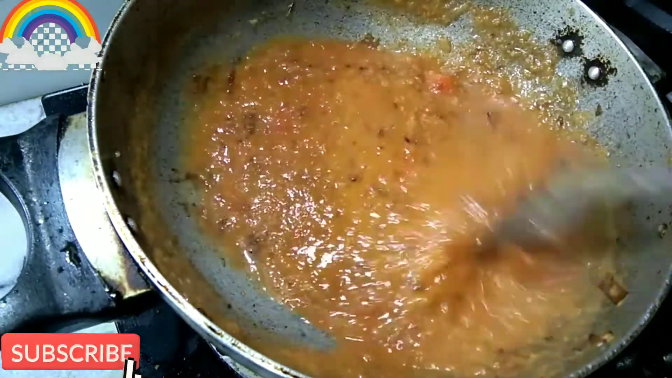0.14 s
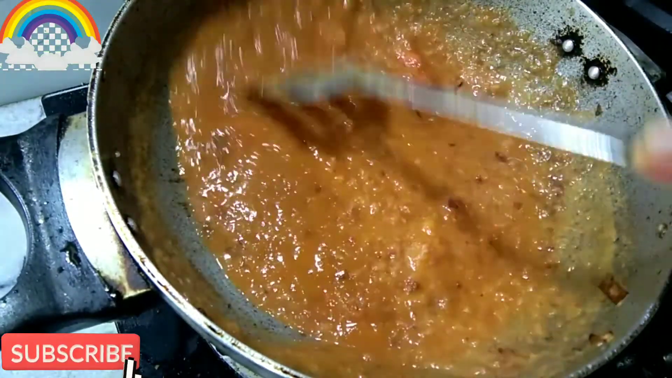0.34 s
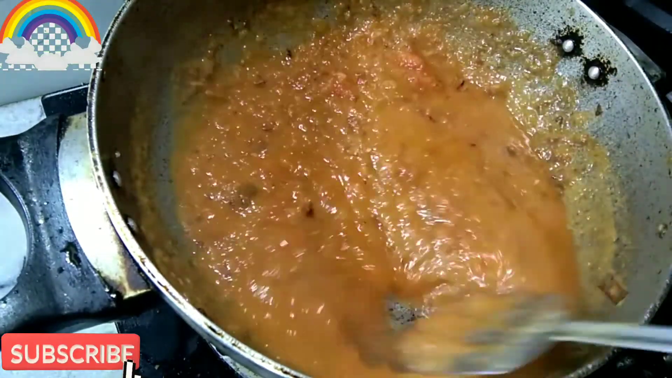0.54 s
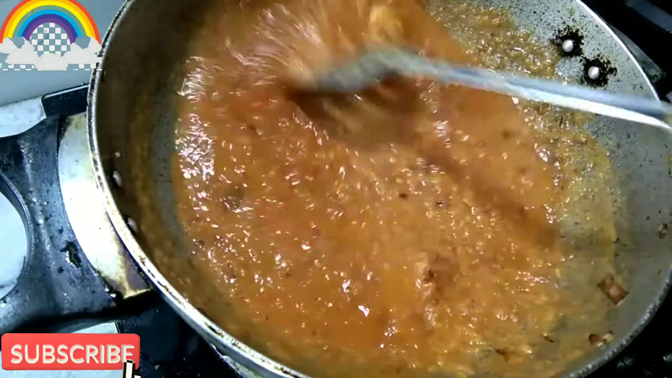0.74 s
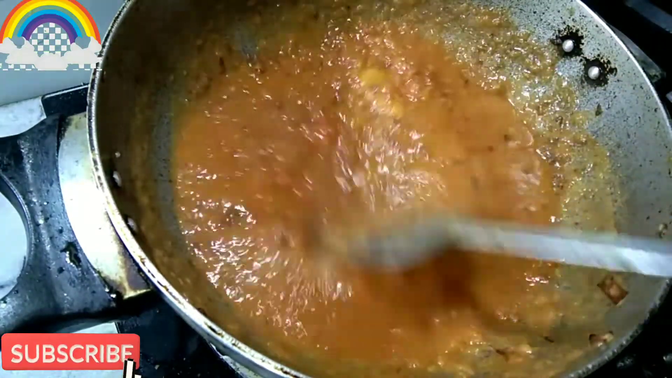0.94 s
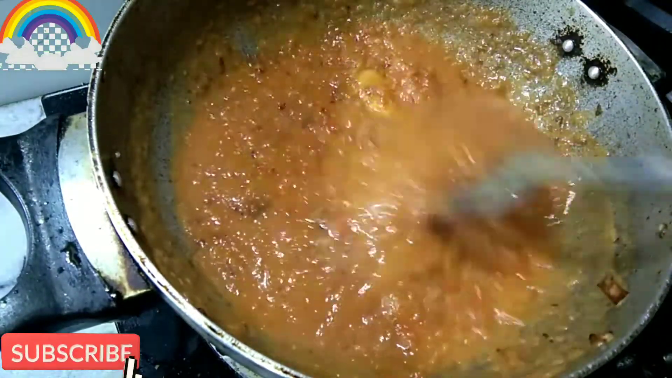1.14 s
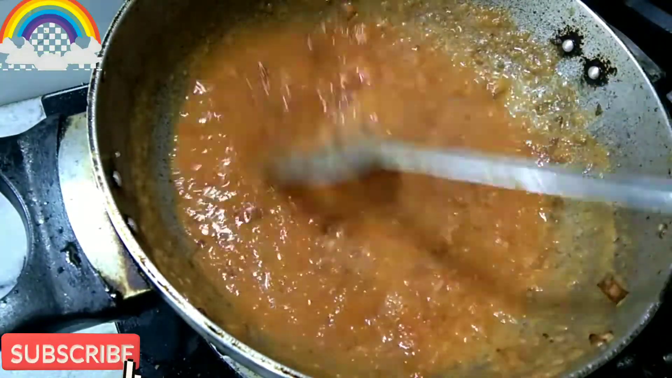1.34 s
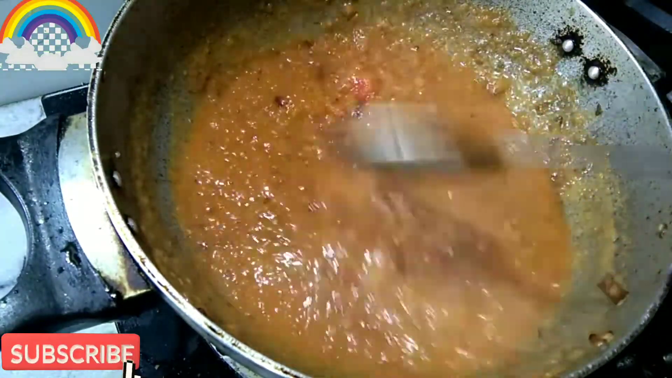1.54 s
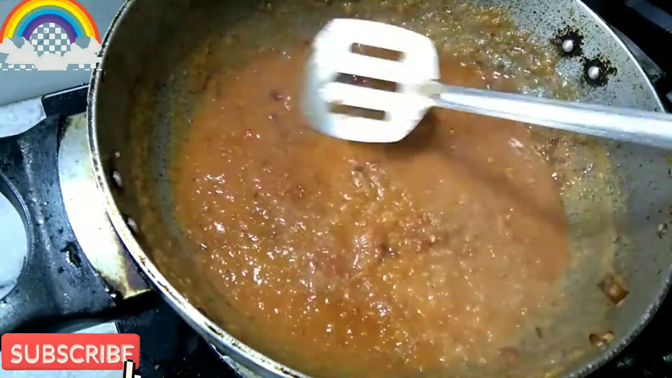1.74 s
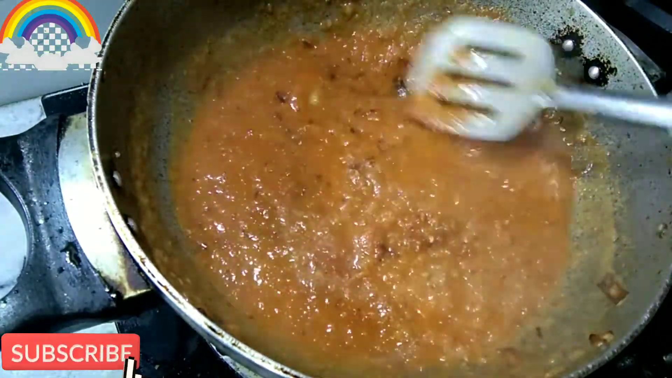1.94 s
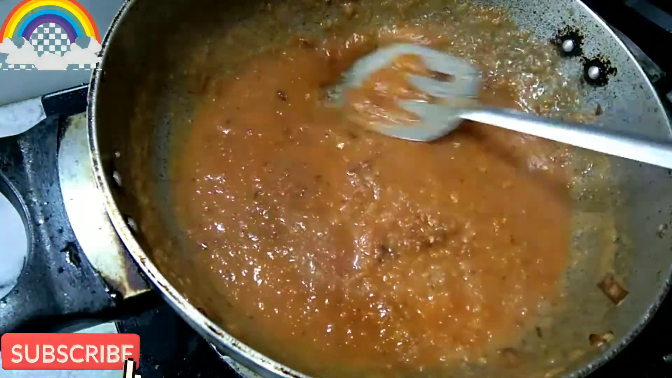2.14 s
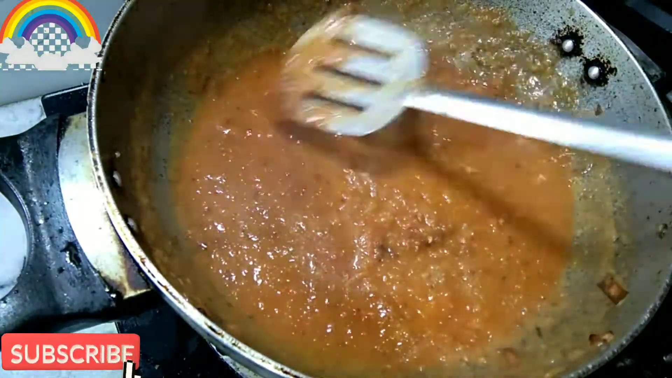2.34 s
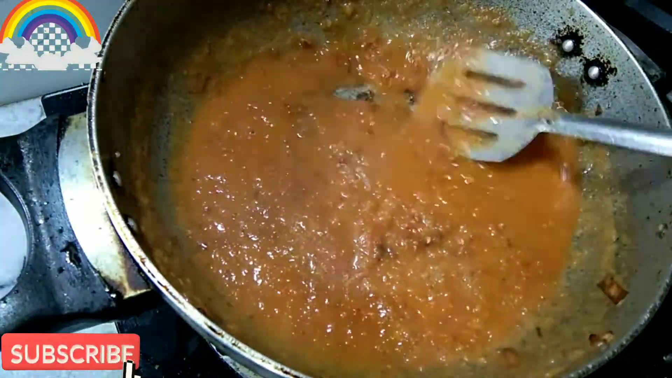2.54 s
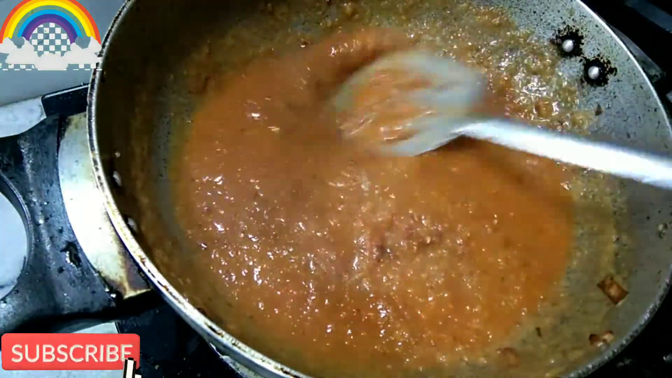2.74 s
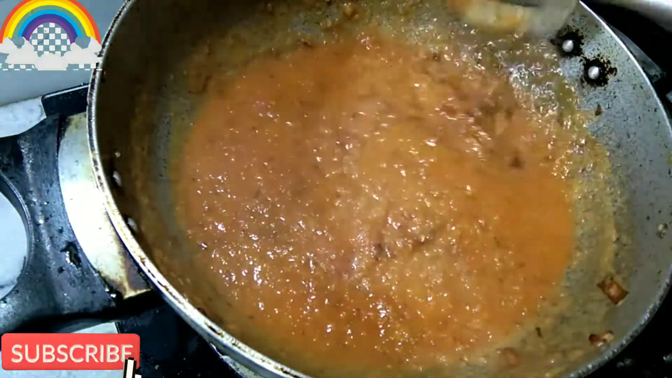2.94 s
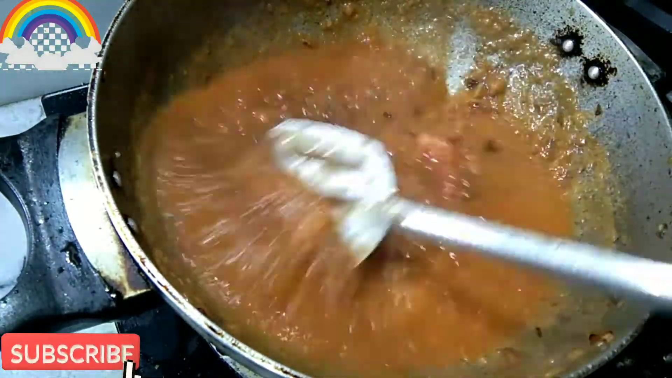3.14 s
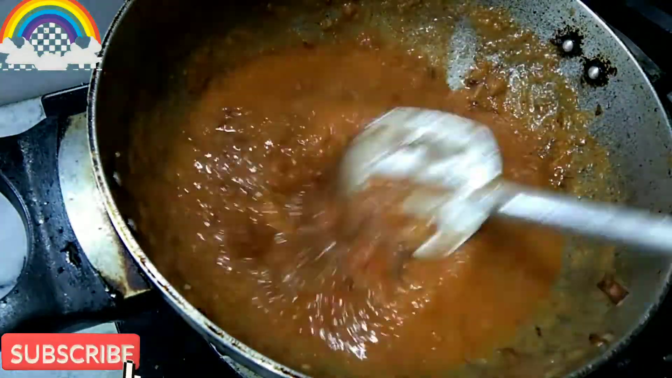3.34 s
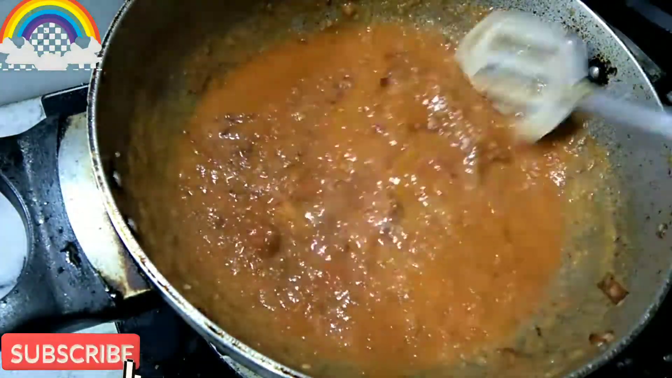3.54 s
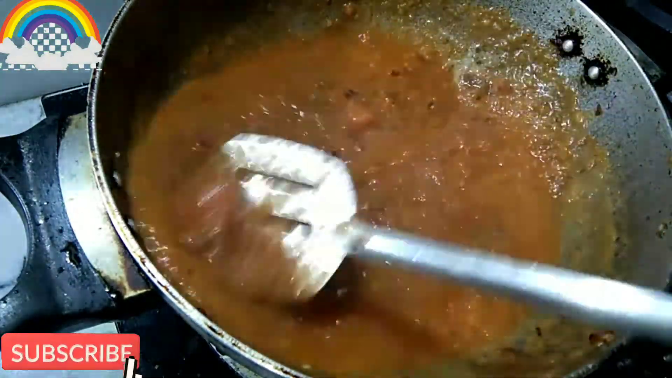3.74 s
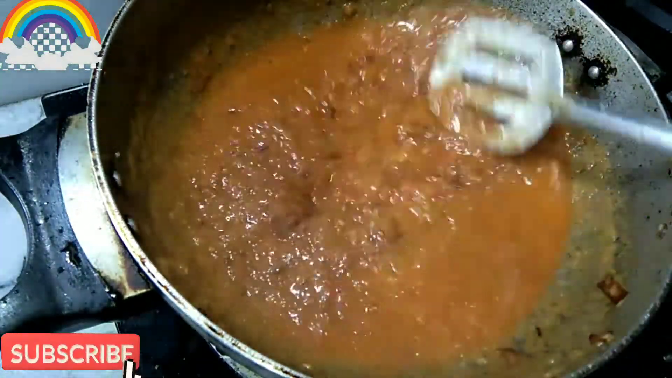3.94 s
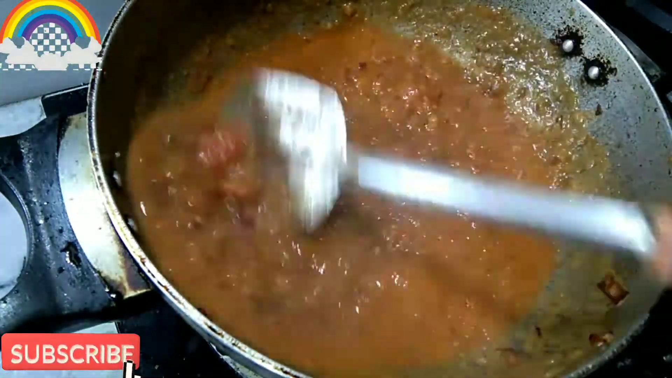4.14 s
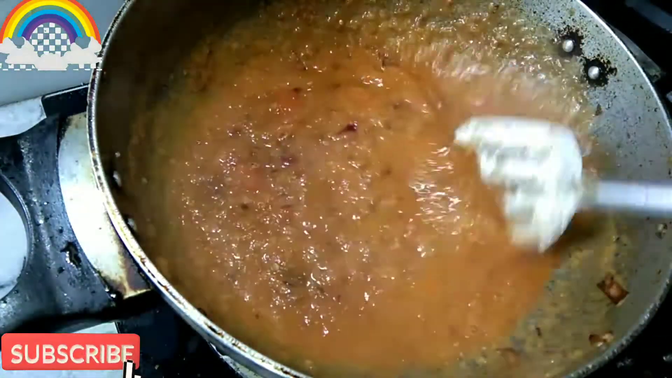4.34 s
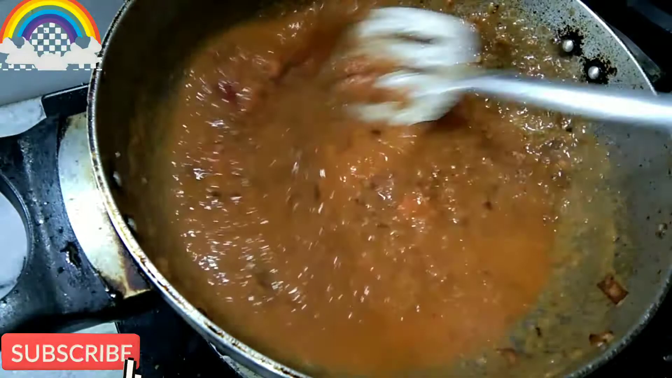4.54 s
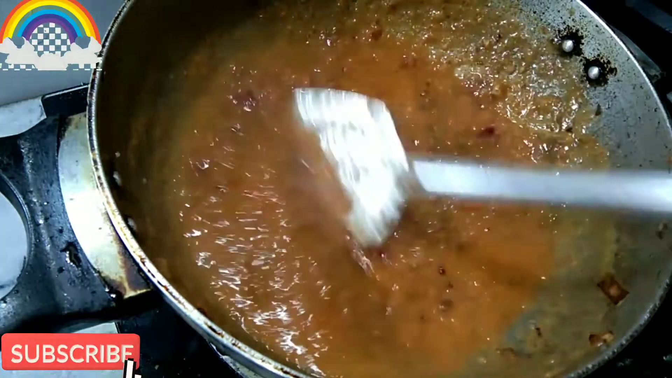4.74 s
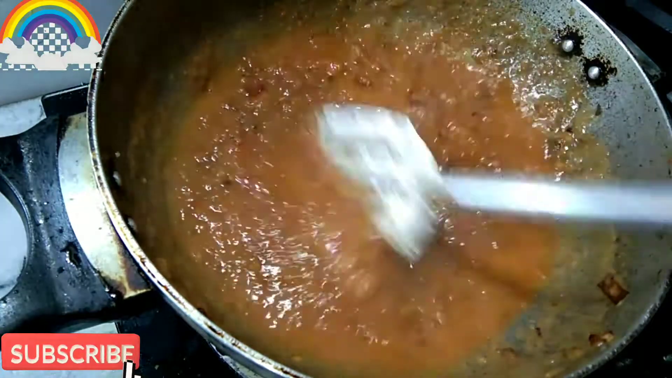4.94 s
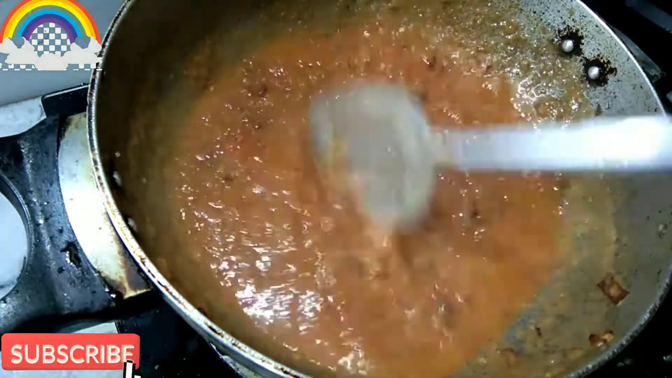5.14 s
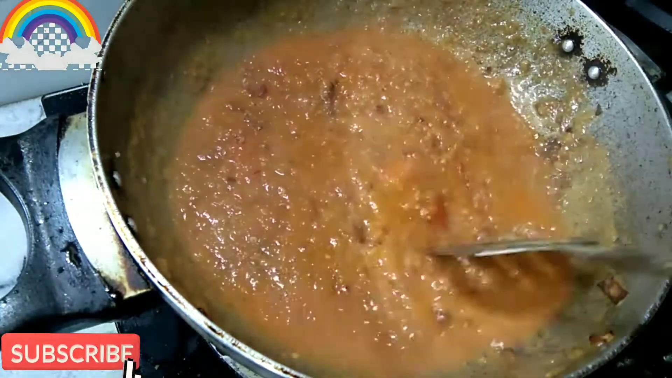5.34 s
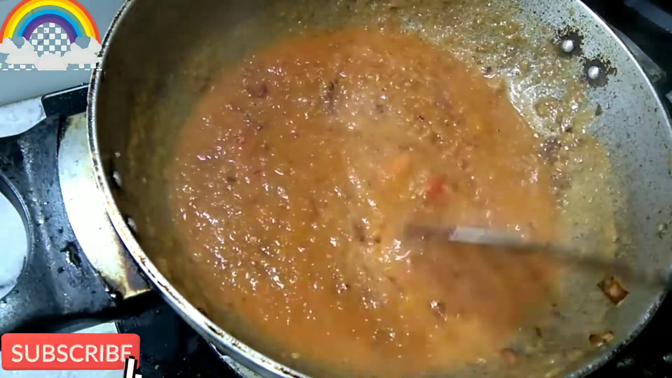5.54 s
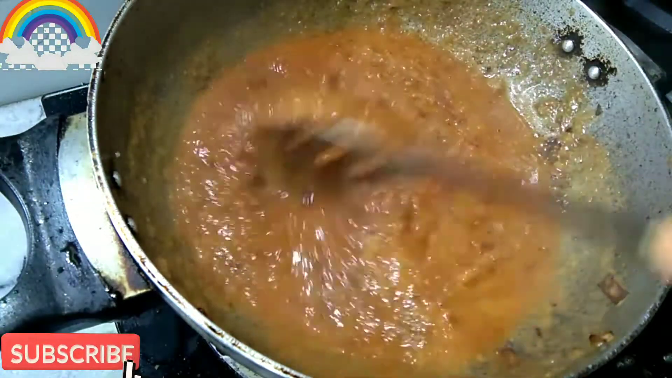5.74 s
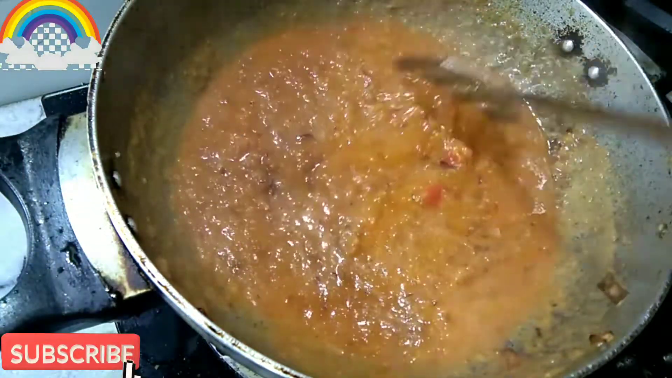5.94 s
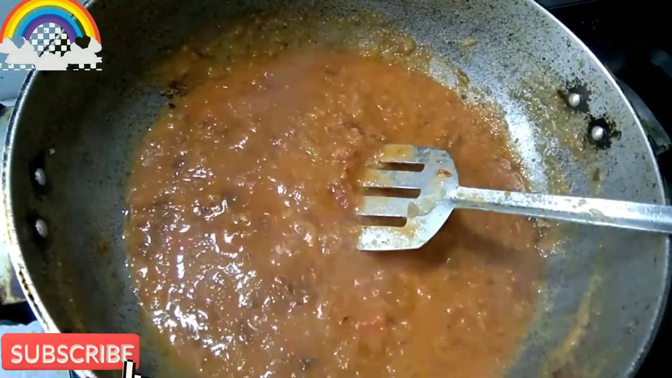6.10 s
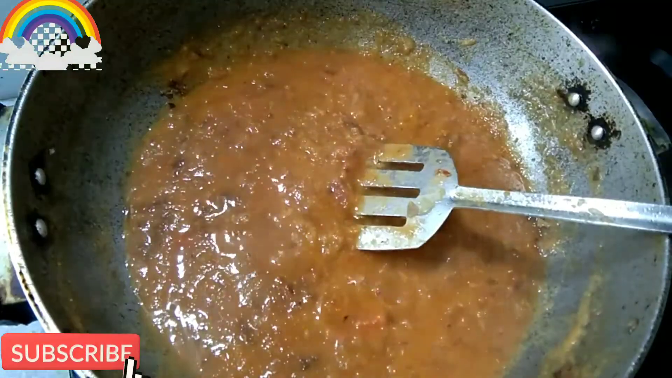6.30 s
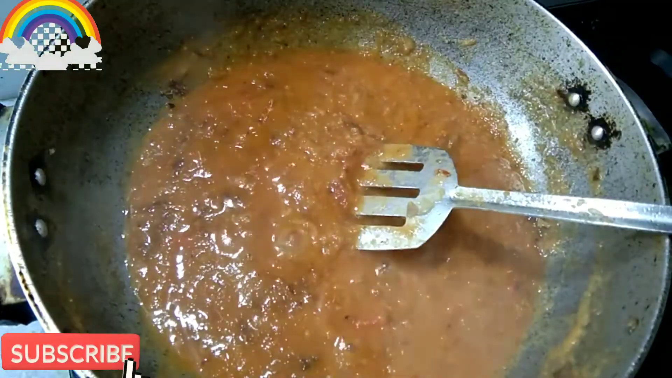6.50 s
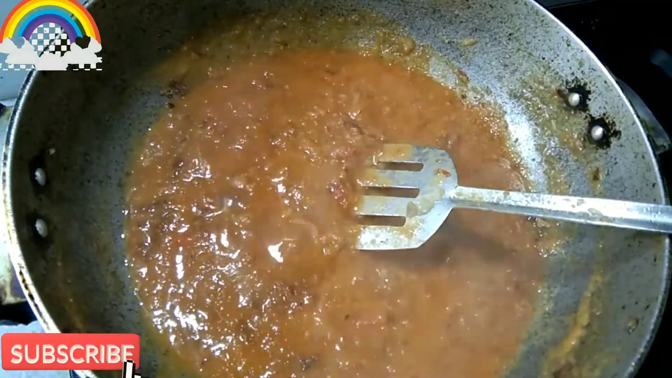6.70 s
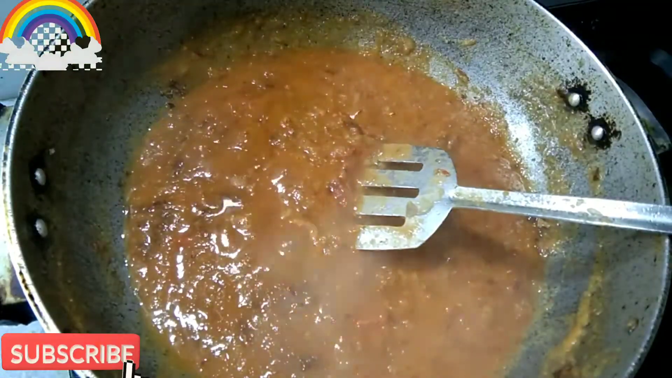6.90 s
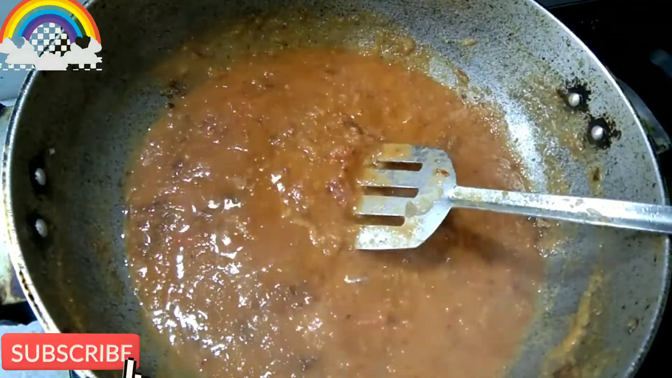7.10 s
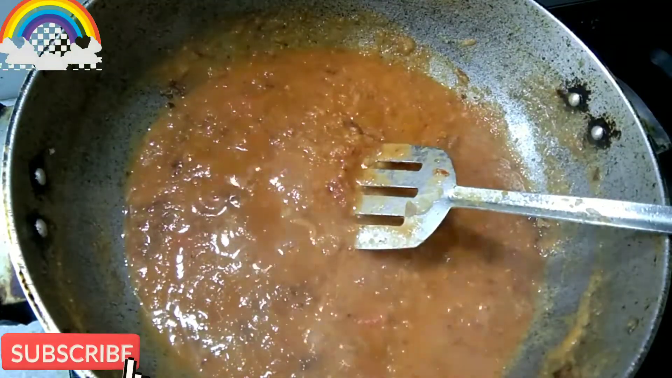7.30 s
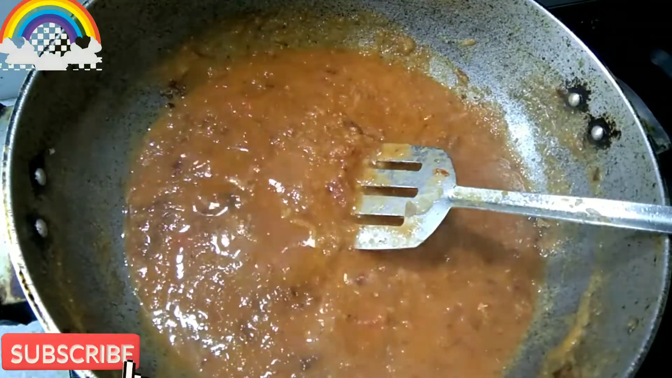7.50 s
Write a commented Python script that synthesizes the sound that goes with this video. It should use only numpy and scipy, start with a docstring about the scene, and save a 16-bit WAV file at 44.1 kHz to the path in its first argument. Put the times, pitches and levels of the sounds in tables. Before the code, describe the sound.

In a small kitchen, a slotted metal spatula rapidly scrapes a pan of thick paste, gritty and dull. A quieter gap follows with faint high whistles from outside, then sharper knocks and scattered scrapes, some loud. The scene cuts abruptly to simmering: fizz, small bubbles popping and bright fat spits, with one light touch of metal. A low burner rumble lies beneath. Close microphone, short room echo.

```python
"""A slotted steel spatula scrapes and knocks on a round metal pan of simmering paste in a small kitchen.
Scrapes are gritty noise and knocks are short noise bursts; both drive the pan's modes, a short dull ring
damped by the paste. The burner rumbles as filtered noise and thin whistles, narrow noise, come from outside.
Near the end the scene jumps to a later moment: the spatula rests and the paste bubbles and spits,
made of fizz, hiss and short damped tones."""
import sys
import numpy as np
from scipy import signal
from scipy.io import wavfile
from scipy.ndimage import uniform_filter1d

SR = 44100
rng = np.random.default_rng(int(sys.argv[2]) if len(sys.argv) > 2 else 0)


def int16_out(signal):
    """Quantize to a 16-bit WAV file."""
    q = np.round(np.clip(np.atleast_2d(signal).T, -1, 1) * 32767)
    wavfile.write(sys.argv[1], SR, q.astype(np.int16))


N = 333512  # length in samples
SPLIT_HZ = 3000  # below is the body of a sound, above is its edge
JUMP_S = 6.043  # when the scene jumps to the later moment


def gain_of(db):
    """Turns dB into a plain gain."""
    return 10 ** (np.asarray(db) / 20)


def evened(x):
    """Scales a sound to rms 1."""
    return x / np.sqrt(np.mean(x ** 2) + 1e-20)


def read(points, hz):
    """Reads a table of (Hz, value) along a log frequency axis."""
    f, value = np.transpose(points)
    return np.interp(np.log(hz + 1), np.log(f + 1), value)


def add(mix, s, sound):
    """Mixes a sound in at time s, cut at the end of the mix."""
    part = mix[..., round(s * SR):][..., :sound.shape[-1]]
    part += sound[..., :part.shape[-1]]


def colour(x, points):
    """Filters with the given spectrum, minimum phase (nothing sounds early), total energy 1."""
    spectrum_db = read(points, abs(np.fft.fftfreq(4096, 1 / SR)))
    log_gain = np.log(gain_of(np.maximum(spectrum_db, -100)))
    # the Hilbert transform of the log gain gives the minimum phase
    taps = np.fft.ifft(np.exp(np.conj(signal.hilbert(log_gain)))).real[:2048]
    return signal.oaconvolve(x, taps / np.linalg.norm(taps))[:len(x)]


def ring(x, hz, width):
    """One mode with a peak gain of 1; a wider mode (Hz) dies sooner."""
    pole = np.exp((2j * np.pi * hz - np.pi * width) / SR)
    return 2 * signal.lfilter([1 - abs(pole)], [1, -pole], x + 1e-18).real


def drift(per_s):
    """Slow chance: noise averaged twice over 1 / per_s seconds, rms 1."""
    size = max(round(SR / per_s), 1)
    smooth = uniform_filter1d(uniform_filter1d(rng.standard_normal(N), size), size)
    return evened(smooth)


def band(x, side):
    """Body (0) or edge (1) of a sound."""
    return signal.sosfilt(signal.butter(4, SPLIT_HZ, ["low", "high"][side], fs=SR, output="sos"), x)


def grit(per_s, spread_db):
    """Random clicks, a few of them large, rms 1."""
    size = gain_of(spread_db * np.minimum(rng.exponential(1, N), 5))
    signed = size * rng.choice([-1., 1.], N)
    return evened(signed * (rng.random(N) < per_s / SR))


def pressure():
    """Bite, hold and lift of every stroke, for body and edge, and the pitch that the contact favours."""
    # Each row is one drag of the blade: start in seconds, length in seconds, level in dB, swell in dB by
    # its end, pitch in Hz that the contact favours, brightness in dB of the edge above the body.
    stroke_rows = [(0.0, 0.08, -50.5, -6, 1720, -3.5), (0.097, 0.025, -62.5, 5.5, 720, -8),
                   (0.147, 0.051, -40, -1, 720, -7), (0.192, 0.032, -47, -1.5, 1237, -4.5),
                   (0.238, 0.044, -39.5, -1.5, 674, -8.5), (0.344, 0.029, -43.5, -6.5, 710, -12),
                   (0.379, 0.0072, -44.5, -1.5, 2160, -6), (0.42, 0.017, -41, -7, 2190, -2),
                   (0.458, 0.033, -49.5, 2, 1280, -4), (0.499, 0.019, -49, -4, 2030, -5.5),
                   (0.541, 0.15, -68.5, -2, 695, -12), (0.631, 0.015, -47, -3.5, 1290, -6.5),
                   (0.661, 0.03, -46, -0.5, 860, -9), (0.7, 0.0099, -43.5, 2, 1260, -6),
                   (0.774, 0.0093, -47.5, -1.5, 704, -9), (0.824, 0.042, -42.5, -1.5, 710, -11),
                   (0.86, 0.058, -48, 3, 1240, -1.5), (0.906, 0.075, -46, -2, 1540, -5.5),
                   (1.007, 0.014, -49.5, -2, 1595, -3.5), (1.113, 0.064, -48, -8.5, 643, -15.5),
                   (1.183, 0.029, -61, -1.5, 1200, 2), (1.233, 0.032, -45, 1, 650, -11),
                   (1.29, 0.036, -56.5, -7, 700, -6), (1.335, 0.0095, -45, -3.5, 1230, -6.5),
                   (1.367, 0.018, -58.5, 2, 1300, -1), (1.392, 0.02, -45, -6.5, 2050, -5.5),
                   (1.423, 0.027, -49, -0.5, 1274, -4.5), (2.143, 0.074, -68, -1.5, 1080, 0),
                   (2.737, 0.021, -52, -5.5, 2230, 1), (3.005, 0.043, -46, 5.5, 840, -4),
                   (3.226, 0.011, -45.5, -11, 1080, -12), (3.262, 0.031, -62, 12.5, 680, -7),
                   (3.297, 0.051, -48, 1, 2150, -2), (3.567, 0.012, -44, 0, 850, 4),
                   (3.582, 0.015, -34, -6, 1450, 0.5), (3.774, 0.021, -36.5, -10, 2400, -6),
                   (3.815, 0.03, -58.5, 5.5, 1160, 3), (3.985, 0.025, -35.5, -9.5, 1440, -10.5),
                   (4.063, 0.078, -53, 2.5, 1220, 0.5), (4.124, 0.021, -43.5, -4.5, 1023, -11),
                   (4.193, 0.03, -51.5, 3.5, 1420, -2), (4.276, 0.054, -54.5, 1, 1300, -0.5),
                   (4.378, 0.028, -46.5, -5.5, 700, -19), (4.426, 0.048, -52, 1.5, 795, -5.5),
                   (4.513, 0.013, -50, -0.5, 2346, -3.5), (4.574, 0.034, -59, 5.5, 1340, 0.5),
                   (4.645, 0.028, -39, -3.5, 1080, -5), (4.75, 0.01, -55.5, -3.5, 1150, 5.5),
                   (4.784, 0.031, -54, -1.5, 1180, -2.5), (4.833, 0.021, -55, -5.5, 1180, 5),
                   (4.886, 0.016, -55, 1.5, 1280, -1), (4.934, 0.028, -40, -7.5, 1323, -2.5),
                   (5, 0.022, -58, 1, 905, -1), (5.054, 0.01, -50.5, -2.5, 2250, 1.5),
                   (5.077, 0.013, -47.5, 2.5, 1380, -7.5), (5.125, 0.03, -47, -8, 1230, -3),
                   (5.293, 0.024, -44.5, -3.5, 2220, -11.5), (5.171, 0.056, -58, -7.5, 664, -6),
                   (5.374, 0.075, -65.5, 3, 670, -7), (5.643, 0.043, -34.5, -7, 1920, -4),
                   (5.692, 0.062, -38.5, -9.5, 920, -11), (5.971, 0.03, -37, -9.5, 2080, -12),
                   (6.575, 0.019, -62.5, -0.5, 900, 4.5), (6.613, 0.019, -54, -6, 1050, 9.5),
                   (6.652, 0.039, -66, -4, 890, 7)]
    bite_s, lift_db_per_s = 0.0051, 428.5  # the blade bites quickly and lifts off at a steady rate
    slide_s = 0.009  # the favoured pitch slides, rather than steps, to its next value
    t, power, near_hz = np.arange(SR // 2) / SR, np.zeros((2, N)), np.ones(N)
    for s, length, db, swell_db, hz, bright_db in stroke_rows:
        held = np.minimum(t / max(length, .005), 1)
        level_db = db + swell_db * held - lift_db_per_s * np.maximum(t - length, 0)
        level_db -= 100 * ((s < JUMP_S) & (s + t > JUMP_S))  # the jump cuts the stroke off
        bite = np.minimum(t / bite_s, 1)
        add(power, s, (bite * gain_of(level_db + [[0], [bright_db]])) ** 2)
        near_hz[round(s * SR):] = hz  # of the strokes begun so far, the last one listed sets the pitch
    return np.sqrt(power), uniform_filter1d(near_hz, max(round(slide_s * SR), 1))


def pan_part(x, modes, wash, wash_db, side):
    """Modes plus broad ring of the body or the edge; little of the modes carries above the top one."""
    lines = sum(ring(x * gain_of(db), hz, width) for hz, width, db in modes)
    lines = signal.sosfilt(signal.butter(6, 8200, fs=SR, output="sos"), lines)
    return lines + gain_of(wash_db) * band(colour(x, wash), side)


def pan(drive, near_hz, wash, wash_db, favour_db, reach, tilt_db, wander_db, damping, unit):
    """The pan's modes over a broad ring, body and edge each scaled to rms 1 for the drive called unit."""
    # Each row is one mode of the pan: pitch in Hz, relative level in dB.
    pan_modes = [(235, -0.5), (390, -8.5), (600, -8), (700, 1.5), (850, -4), (1080, -6.5), (1190, -2),
                 (1300, -6.5), (1420, -13), (1540, -10), (1660, -11), (1980, -9.5), (2090, -10.5),
                 (2260, -15), (2410, -28), (2600, -18), (2800, -21), (3490, -19), (4450, -32), (5300, -35),
                 (5900, -38), (6300, -33.5), (6850, -27.5), (7400, -25)]
    lifts = []
    for hz, _ in pan_modes:
        # the point of contact lifts the modes near one pitch
        nearness = np.exp(-.5 * (np.log(hz / near_hz) / reach) ** 2)
        # as it travels, each mode also swells by chance
        chance_db = wander_db * drift(22.)
        lifts.append(favour_db * nearness + chance_db + tilt_db * np.log2(min(hz, SPLIT_HZ) / 1000))
    out = np.zeros(N)
    for side in range(2):
        # the paste damps high modes faster: width in Hz grows with pitch
        modes = [(hz, (25 + .02 * hz) * damping, db + lift)
                 for (hz, db), lift in zip(pan_modes, lifts) if (hz > SPLIT_HZ) == side]
        sound = pan_part(drive[side], modes, wash, wash_db[side], side)
        norm = pan_part(unit, modes, wash, wash_db[side], side)
        out += sound / np.sqrt(np.mean(norm ** 2))
    return out


def scrape():
    """Stick-slip grit under the blade, pressed by each stroke into the pan."""
    # The dense ring between the modes. Each row: frequency in Hz, relative level in dB per Hz.
    rasp_spectrum = [(60, -26), (150, -9), (300, 4), (700, 3), (2200, -3.5), (5000, -9), (7600, -10.5),
                     (8800, -21), (11000, -50.5), (15400, -44.5), (15700, -48)]
    press, near_hz = pressure()
    rub = evened(grit(2600., 2.8) + .75 * rng.standard_normal(N))
    rub = rub * gain_of(1.5 * drift(160.))  # the level flutters
    return pan(press * rub, near_hz, rasp_spectrum, wash_db=[-21, -22], favour_db=11.5, reach=.08,
               tilt_db=1., wander_db=4., damping=1., unit=rub)


def air():
    """Burner rumble and kitchen hush as filtered noise, with far whistles of narrow noise."""
    # Burner and kitchen. Each row: frequency in Hz, relative level in dB per Hz.
    hush_spectrum = [(12, -37), (20, -28.5), (42, -4.5), (170, 2.5), (296, -10), (663, -18.5), (851, -17),
                     (1160, -20.5), (3920, -24), (4260, -24.5), (5320, -20.5), (9280, -35), (15300, -53)]
    # Thin high whistles, perhaps a far bird. Each row: start in seconds, pitch in Hz, level in dB.
    whistle_rows = [(0.578, 9050, -88), (1.721, 7860, -82), (1.885, 9000, -87), (2.27, 8900, -88),
                    (2.29, 5300, -77), (2.49, 9000, -84.5), (2.66, 9100, -85), (2.9, 8360, -85),
                    (5.2, 8850, -81), (5.43, 9300, -86), (5.44, 5120, -85.5)]
    hush = evened(colour(rng.standard_normal(N), hush_spectrum))
    out = gain_of(-67.5) * hush * gain_of(0.45 * drift(3.4))
    for s, hz, db in whistle_rows:
        hiss = rng.standard_normal(4200)
        fuzzy = evened(ring(ring(hiss, hz, 430.0), hz, 400.))
        add(out, s, gain_of(db) * fuzzy * signal.windows.tukey(len(hiss), .5))
    return out


def knocks():
    """Each knock is a few milliseconds of chatter that cracks and rings the pan."""
    # Each row is one knock of the spatula: start in seconds, relative strength in dB of the body,
    # brightness in dB of the edge above it, pitch in Hz that the contact favours.
    knock_rows = [(0.149, -39, -19, 796), (0.231, -31.5, -8, 692), (0.646, -37, -12.5, 820),
                  (1.103, -39, -8, 1320), (1.241, -52, 4, 673), (2.141, -43, -4.5, 2370),
                  (2.523, -57.5, -3, 1320), (3.004, -34.5, 9, 1800), (3.007, -33.5, 12, 675),
                  (3.055, -32.5, -8, 727), (3.16, -61, 5.5, 1090), (3.216, -41, -10, 2090),
                  (3.565, -26.5, 8, 1480), (3.588, -30, -1, 1140), (3.767, -19.5, -3, 2350),
                  (3.831, -32.5, -8, 1163), (3.925, -60.5, 5, 1294), (3.988, -20, -2, 1463),
                  (4.137, -52, 4, 990), (4.199, -43.5, -17, 1200), (4.384, -43.5, -5.5, 814),
                  (4.517, -40, -2.5, 1215), (4.587, -43.5, -3.5, 1180), (4.647, -48.5, 14, 1173),
                  (4.9403, -34, -10, 1300), (5.2965, -19.5, -10.5, 2260), (5.644, -23.5, -2, 1930),
                  (5.706, -30.5, -17, 1346), (5.968, -19.5, 1.5, 1081), (6.623, -43.5, 6, 955)]
    # The broad crack. Each row: frequency in Hz, relative level in dB per Hz.
    crack_spectrum = [(88, -33), (150, -22), (391, -35), (612, -11), (1170, -1.5), (3490, 8), (4160, 3.5),
                      (7180, 15), (8560, 0.5), (15100, -34.5), (16000, -61)]
    t, drive, near_hz = np.arange(600) / SR, np.zeros((2, N)), np.ones(N)
    chatter = rng.standard_normal((len(knock_rows), len(t)))
    chatter = chatter * gain_of(-60 * t / 0.017) * np.minimum(t / 0.000099, 1)
    chatter[:, round(.0004 * SR)] += 4.  # the first clean contact
    for (s, db, bright_db, hz), burst in zip(knock_rows, chatter):
        add(drive, s, gain_of([[db], [db + bright_db]]) * burst / np.linalg.norm(burst))
        near_hz[round(s * SR):] = hz
    rung = pan(drive, near_hz, crack_spectrum, wash_db=[-8, -12], favour_db=11.0, reach=0.047,
               tilt_db=3.5, wander_db=3.5, damping=4.7, unit=rng.standard_normal(N))
    # a quick blow hardly moves the lowest modes
    return gain_of(17.) * signal.lfilter(*signal.butter(2, 500, "high", fs=SR), rung)


def thuds():
    """The pan rocks on its stand and booms: a short shudder in one low mode."""
    # Each row: start in seconds, peak in dB, pitch in Hz.
    thud_rows = [(0.67, -43, 257), (1.109, -43, 232), (1.239, -50, 259), (4.649, -39, 381),
                 (5.697, -57, 430), (6.543, -51, 141)]
    out, t = np.zeros(N), np.arange(5000) / SR
    shudder = rng.standard_normal((len(thud_rows), len(t)))
    shudder = shudder * np.minimum(t / .006, 1) * gain_of(-60 * t / .2)
    for (s, db, hz), shake in zip(thud_rows, shudder):
        boom = ring(ring(shake, hz, 85.0), hz, 85.0)
        add(out, s, gain_of(db) * boom / abs(boom).max())
    return out


def blip(hz, cycles, glide):
    """A short damped tone whose envelope peaks at 1; its pitch rises if glide is above 0."""
    u = np.arange(round(3 * cycles * SR / hz)) * hz / SR / cycles
    envelope = np.e * 3 * u * np.exp(-3 * u)
    return envelope * np.sin(2 * np.pi * cycles * u * (1 + glide * u))


def simmer():
    """Fine fizz, sizzling hiss, a crowd of small bubbles and ticks, and the large ones that stand out."""
    # The fizz. Each row: frequency in Hz, relative level in dB per Hz.
    fizz_spectrum = [(120, -49), (200, 8.5), (422, 8.5), (677, 4.5), (1230, 8.5), (3070, -6), (6590, 2),
                     (7480, -6.5), (9830, -41), (15400, -20), (15700, -54)]
    # The fat sizzles in gusts. Each row: time in seconds, level in dB of the treble hiss.
    sizzle_gusts = [(6.05, -78), (6.138, -74), (6.188, -77), (6.322, -70), (6.772, -79), (6.916, -76),
                    (7.214, -82), (7.496, -77), (7.56, -80)]
    # Fat spitting, bright ticks. Each row: start in seconds, peak in dB, centre in Hz.
    spit_rows = [(6.058, -42, 6450), (6.119, -46.5, 6040), (6.2396, -44, 6150), (6.2857, -42.5, 6900),
                 (6.535, -39, 5900), (6.195, -56, 5760), (6.314, -48, 6400), (6.366, -49, 6900),
                 (6.39, -49, 6500), (6.47, -49.5, 6200), (6.711, -50, 7000), (7.103, -54, 6040),
                 (7.126, -53, 5800), (7.311, -51, 6900), (7.427, -51.5, 6500), (6.062, -54, 4060),
                 (7.546, -52, 4250), (6.771, -45.5, 6800), (6.832, -44.5, 5940), (6.8843, -42, 6600),
                 (6.9716, -37.5, 6800), (7.1453, -46, 6750), (7.1823, -46.5, 7300), (7.2616, -46, 6950),
                 (7.4525, -48, 6080), (7.4814, -46, 6900), (7.504, -46.5, 6900), (7.5383, -49, 7150)]
    # Bubbles bursting in the paste. Each row: start in seconds, peak in dB, starting pitch in Hz.
    bubble_rows = [(6.212, -53, 660), (6.247, -47.5, 1074), (6.384, -54, 1300), (6.415, -50.5, 880),
                   (6.457, -53, 1250), (6.507, -43.5, 1760), (6.576, -47, 1150), (6.679, -45.5, 1150),
                   (6.781, -51, 1580), (6.81, -48.5, 1600), (6.844, -49.5, 1180), (6.813, -48, 3380),
                   (6.089, -52, 2780), (7.126, -45.5, 1030), (7.148, -46.5, 1630), (7.223, -49, 690),
                   (7.262, -45.5, 1250), (7.47, -46, 1160)]
    sizzle_hz, sizzle_width_hz = 6900, 1400

    fizz = evened(colour(grit(3000., 4.5) + .8 * rng.standard_normal(N), fizz_spectrum))
    fizz = fizz * gain_of(2.2 * drift(25.))
    small = sum(signal.oaconvolve(grit(70., 3.2), evened(blip(hz, 2.5, .1)))[:N]
                for hz in np.geomspace(600, 2200, 10))
    ticks = sum(signal.oaconvolve(grit(35., 3.5), evened(blip(hz, 4.5, 0)))[:N]
                for hz in np.geomspace(5000, 7800, 8))
    out = gain_of(-68.5) * fizz + gain_of(-68) * evened(small)
    out += gain_of(-77.5 + 6.1 * drift(10.0)) * evened(ticks)

    hiss = ring(grit(6000., 4.5), sizzle_hz, sizzle_width_hz)
    hiss = evened(ring(hiss, sizzle_hz, sizzle_width_hz))
    gust_db = np.interp(np.arange(N) / SR, *np.transpose(sizzle_gusts))
    out += hiss * gain_of(gust_db + 3.5 * drift(49.0))

    for s, db, hz in spit_rows:
        add(out, s, gain_of(db) * blip(hz, 5.1, 0))
        add(out, s + .002, gain_of(db - 7.0) * blip(1.07 * hz, 6., 0))  # the droplet lands
        add(out, s, gain_of(db - 11.5) * blip(0.56 * hz, 3.5, 0))  # the broad snap under the tick
    for s, db, hz in bubble_rows:
        add(out, s, gain_of(db) * blip(hz, 3., .08))
    return out


def kitchen(x):
    """The room's echo: sparse taps of random sign, each band dying at its own speed."""
    # Each row: frequency in Hz, time in seconds to die by 60 dB.
    decay_times = [(200, 0.72), (700, 0.41), (2000, 0.27), (6000, 0.26), (12000, 0.2)]
    taps = np.zeros(SR // 2)
    at = np.arange(130, len(taps) - 20, 20)
    taps[at + rng.integers(0, 20, len(at))] = rng.choice([-1., 1.], len(at))
    hz, t, z = signal.stft(taps, SR, nperseg=256)
    fade = gain_of(-60 * t / read(decay_times, hz)[:, None])
    tail = signal.istft(z * fade, SR, nperseg=256)[1]
    return signal.fftconvolve(x, tail / np.linalg.norm(tail))[:N]


def scene():
    """Stirring until the jump, simmering and a few last touches after it, over the same kitchen air."""
    later = np.clip((np.arange(N) / SR - JUMP_S) / 0.0031, 0, 1)  # 0 before the jump, 1 after
    rub = scrape()
    hits = knocks() + thuds()
    before = (rub + hits) * (later == 0)
    after = (rub + hits) * (later > 0) + simmer() * later
    stirring = before + gain_of(-12.5) * kitchen(before)
    simmering = after + gain_of(-18.5) * kitchen(after)
    return (stirring * (1 - later) + simmering + air())[None]


def record(dry):
    """The band limit: a steep low-pass at 16400 Hz."""
    taps = signal.firwin(511, 16400, window=("kaiser", 9), fs=SR)
    return signal.oaconvolve(dry, taps[None], "same")


dry = scene()
out = record(dry)
int16_out(out)
```